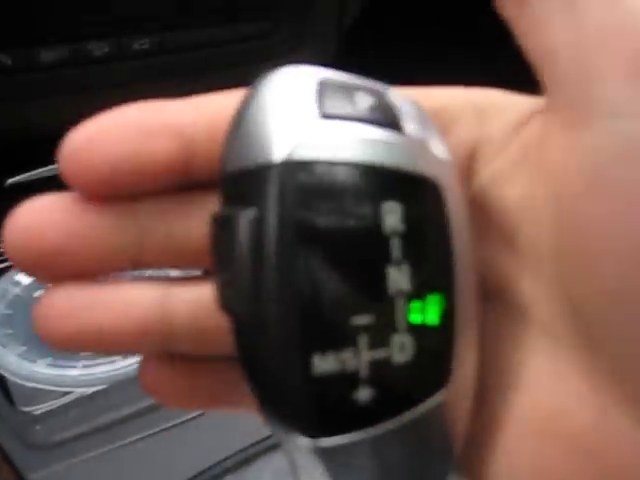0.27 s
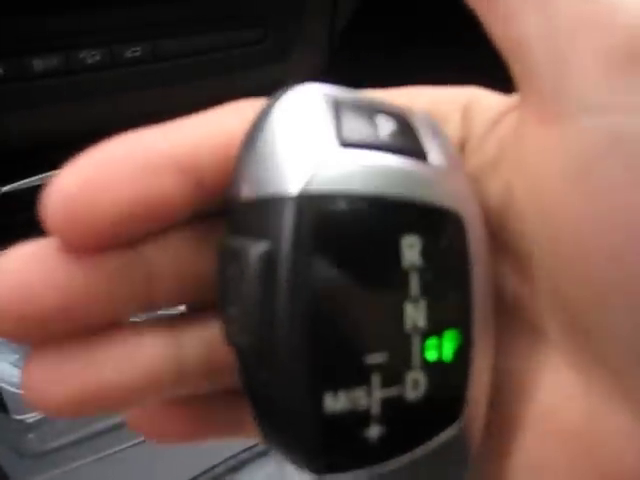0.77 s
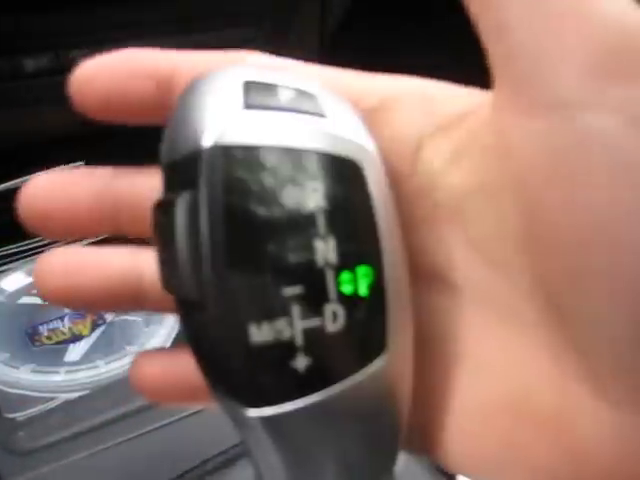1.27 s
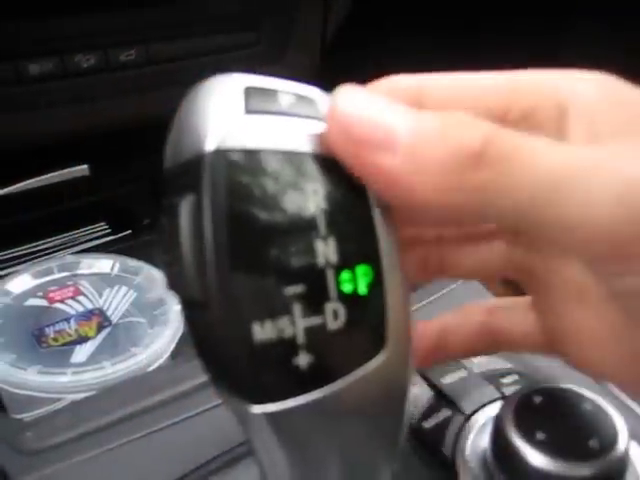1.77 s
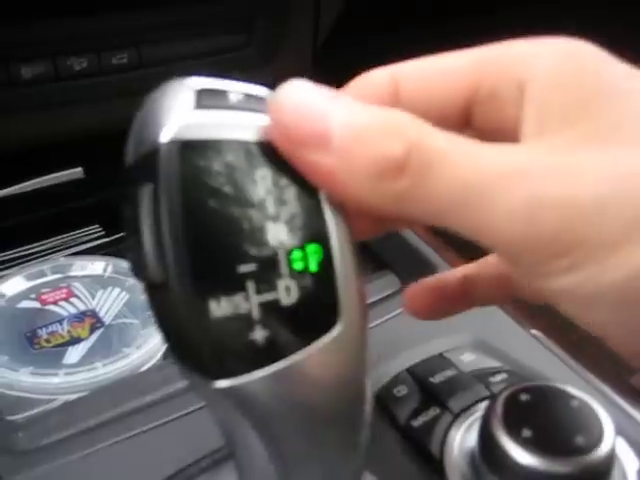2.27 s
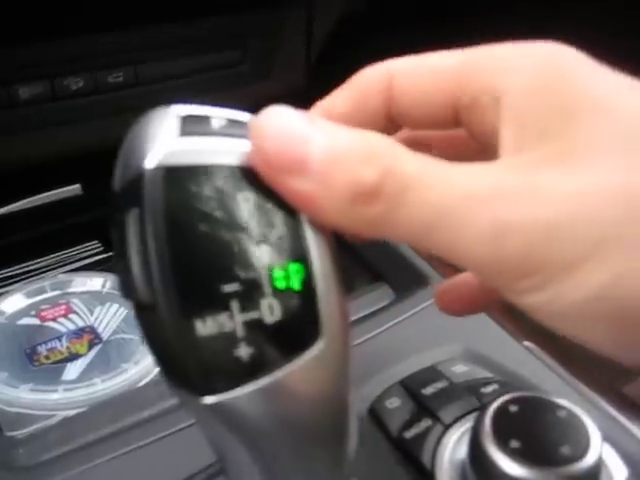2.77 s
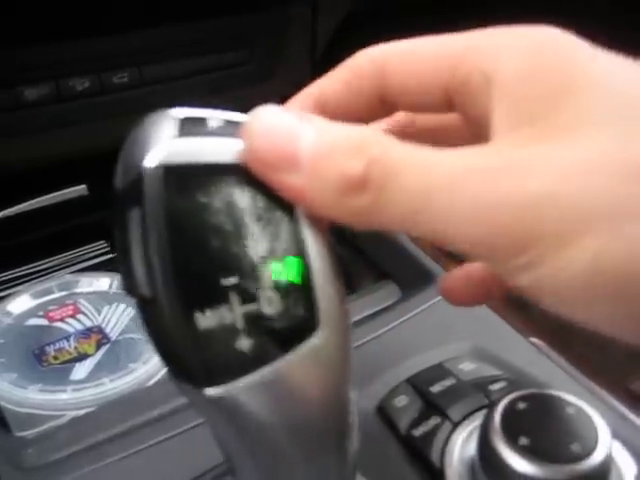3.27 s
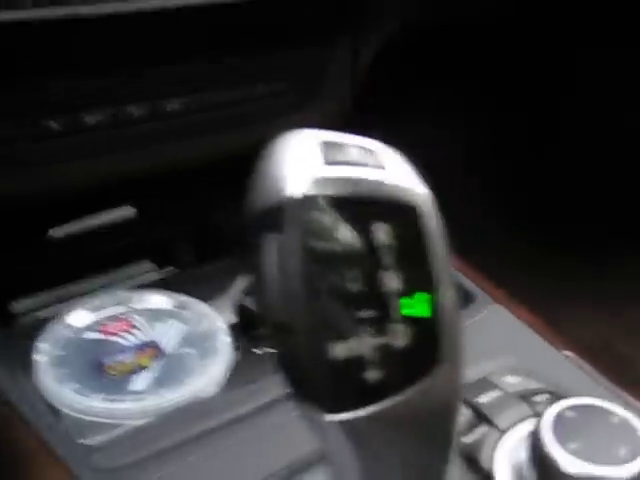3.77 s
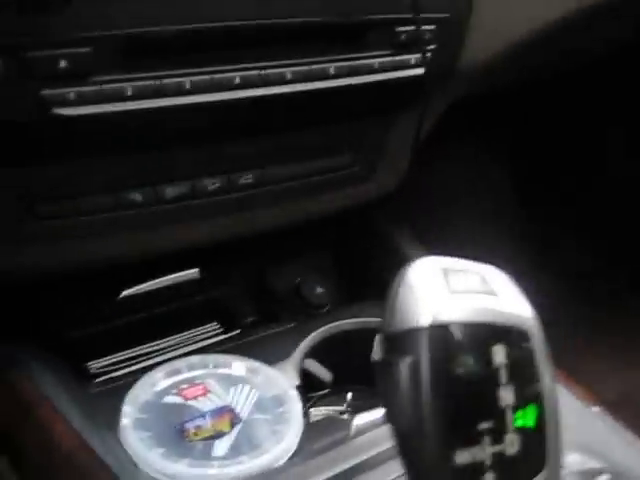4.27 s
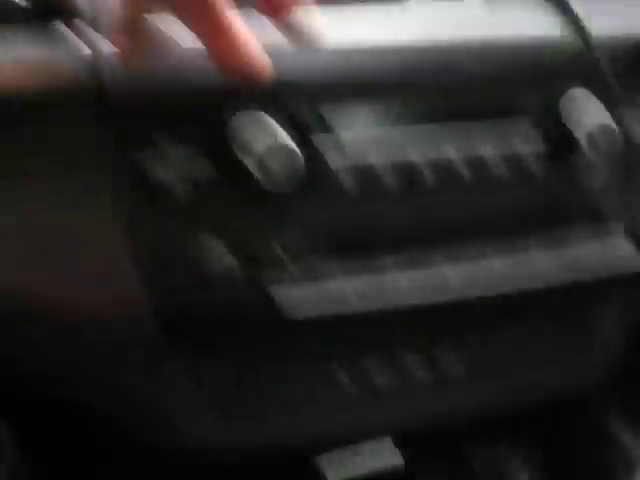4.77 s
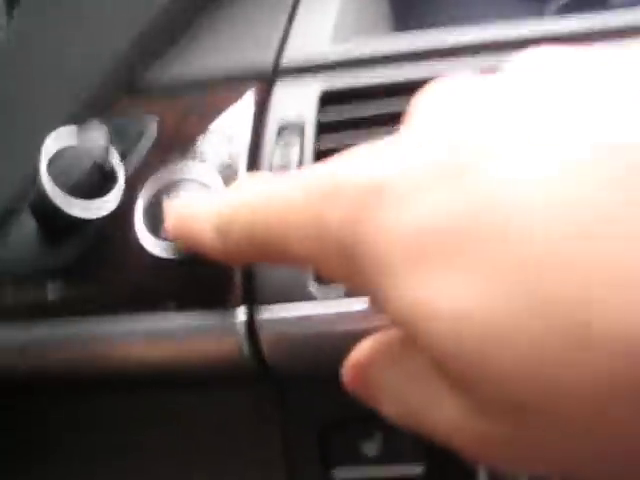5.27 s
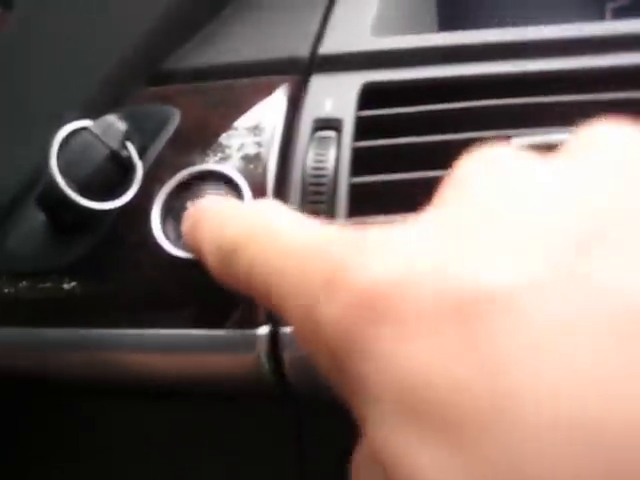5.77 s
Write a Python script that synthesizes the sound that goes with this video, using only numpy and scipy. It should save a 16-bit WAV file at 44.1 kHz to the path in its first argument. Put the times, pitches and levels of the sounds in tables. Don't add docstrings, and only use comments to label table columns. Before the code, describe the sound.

Close up in a car cabin, a gear selector snaps and knocks, a seat creaks, a button clunks, and muffled traffic roar swells.

```python
import sys
import numpy as np
from scipy import signal
from scipy.fft import rfft, irfft
from scipy.io import wavfile
from scipy.ndimage import uniform_filter1d

SR = 44100
rng = np.random.default_rng(int(sys.argv[2]) if len(sys.argv) > 2 else 0)


def voltage_ratio(decibels):
    exponent = np.asarray(decibels, float) / 20
    return 10 ** exponent


def int16_out(signal):
    q = np.round(np.clip(np.atleast_2d(signal).T, -1, 1) * 32767)
    wavfile.write(sys.argv[1], SR, q.astype(np.int16))


N = 265393


def set_rms(x, db):
    return x * voltage_ratio(db) / np.sqrt(np.mean(x ** 2))


def resonance(x, hz, width_hz):
    return signal.lfilter(*signal.iirpeak(min(hz, .45 * SR), hz / width_hz, fs=SR), x)


def double_resonance(x, hz, width_hz):
    return resonance(resonance(x, hz, width_hz), hz, width_hz)


def shaped_noise(spectrum):
    hz, db = np.transpose(spectrum)
    bins_hz = np.arange(1, N // 2 + 2) * SR / N
    gain = voltage_ratio(np.interp(np.log(bins_hz), np.log(hz), db))
    return set_rms(irfft(rfft(rng.standard_normal(N)) * gain, N), 0)


def wander(rate_hz):
    hold = int(SR / rate_hz)
    steps = np.repeat(rng.standard_normal(N // hold + 1), hold)
    return 0.54 * uniform_filter1d(steps, hold)[:N]


def mode(force, hz, t60):
    pole = np.exp(2j * np.pi * hz / SR - np.log(1000) / (max(t60, .002) * SR))
    return signal.lfilter([1], [1, -pole], force).imag


def place(out, x, s, peak_db):
    i = int(s * SR)
    out[i:i + len(x)] += (voltage_ratio(peak_db) * x / np.abs(x).max())[:N - i]


def slip_ticks(chance, rate_hz, scatter_db):
    happens = chance[0] < rate_hz / SR
    size = voltage_ratio(-scatter_db * np.log(chance[2] + 0.0033))
    return happens * np.sign(chance[1] - .5) * size


# (time [s], peak [dB], ring [Hz], ring t60 [s], crack re ring [dB])
LATCH_SNAPS = [(0.6316, -16.5, 2600, .012, -10), (0.6383, -31, 2580, 0.015, -14),
               (0.6404, -9, 2350, 0.013, -5), (0.6412, -17, 4500, .01, 3), (1.053, -34.5, 2400, 0.026, -9),
               (1.114, -21.5, 2030, 0.016, -19), (1.121, -21.5, 3060, 0.005, -3),
               (1.176, -18.5, 2850, .012, 2), (1.1775, -22.5, 5170, 0.013, -11),
               (1.187, -29.5, 1900, 0.017, -23.5), (1.266, -35, 2440, .029, -14),
               (2.2, -33, 1920, 0.044, -14), (2.8382, -20.5, 2720, 0.024, 3), (2.839, -24.5, 1490, 0.04, 3),
               (2.838, -24, 6000, 0.0093, -3), (3.396, -17, 1790, .011, -12),
               (3.406, -18, 2380, .0093, -19), (3.4145, -8.5, 1730, .0058, -9), (3.421, -34, 3080, .01, -4),
               (3.434, -22.5, 4070, 0.016, -3), (3.443, -31, 3130, .012, -12)]
# (time [s], peak [dB], ring [Hz], ring t60 [s], crack re ring [dB])
BUTTON_SNAPS = [(4.013, -31.5, 1370, 0.0089, -8), (4.362, -29, 1240, 0.033, 1),
                (5.158, -30, 1100, 0.0053, -6), (5.192, -24.5, 1680, 0.0043, -8),
                (5.388, -14, 2080, 0.012, 6.5), (5.777, -20, 3410, 0.034, 3), (5.9216, -10, 2910, .016, -1),
                (5.926, -15.5, 1046, .06, -3), (5.939, -6.5, 2470, 0.029, 0.5),
                (5.949, -20, 1900, 0.068, -8), (5.957, -20, 2440, 0.065, 0)]
# (time [s], peak [dB], ring [Hz], crack re ring [dB])
NAIL_TAPS = [(.064, -36, 3470, 0), (1.149, -37, 5000, -6), (4.061, -30.5, 3320, 5), (4.113, -30, 5160, 20),
             (5.148, -28, 3300, 7), (5.16, -28, 5200, 12), (5.165, -19.5, 4120, 2), (5.174, -23, 3800, -14),
             (5.183, -22, 2670, -11), (5.282, -24, 2480, 7), (5.343, -25, 6240, -15),
             (5.429, -23.5, 5940, -2), (5.7, -39, 3740, 2), (5.724, -34, 3500, -5), (5.904, -25, 3370, -11)]


def clicks():
    latch_contact_s, button_contact_s, tap_contact_s, tap_t60_s = .0006, 0.001293, 0.00061, 0.0077
    snaps = [(*row, latch_contact_s) for row in LATCH_SNAPS]
    snaps += [(*row, button_contact_s) for row in BUTTON_SNAPS]
    snaps += [(s, db, hz, tap_t60_s, crack_db, tap_contact_s) for s, db, hz, crack_db in NAIL_TAPS]
    out, t = np.zeros(N), np.arange(4096) / SR
    for s, db, hz, t60, crack_db, contact in snaps:
        noise = rng.standard_normal(4096)
        force = noise * t / contact * np.exp(1 - t / contact)
        force[int(contact * SR)] += 9.0
        body = 2.5 * mode(force, 1.05 * hz, .3 * t60)
        body += mode(force, hz, t60)
        body += .6 * mode(force, .74 * hz, 1.5 * t60)
        body -= .5 * mode(force, 1.32 * hz, .7 * t60)
        body += .45 * mode(force, 1.75 * hz, .5 * t60)
        body = resonance(body, hz, 1.6 * hz)
        crack = resonance(resonance(force, 5100, 7200), 6900, 7800)
        snap = body / np.abs(body).max() + voltage_ratio(crack_db) * crack / np.abs(crack).max()
        tail = signal.fftconvolve(snap[:40], noise[::-1] * np.exp(-t / .012))[:4096]
        place(out, snap + voltage_ratio(-25.0) * resonance(tail, 2400, 5200), s, db)
    return out


# (pitch ratio [1], level [dB], t60 ratio [1])
PANEL_MODES = [(.78, -19, 3.3), (1, 5.5, 2.03), (1.2, 2.5, 1.57), (1.6, -26, 0.55), (2.15, -4, 1.12),
               (2.37, -14, 2.3), (2.8, -2.5, 0.27), (3.4, -13, 1.34), (4.05, -10, 0.78), (4.5, -15, 1),
               (5.6, -12, 0.17), (7.1, -16, 1.05)]
# (time [s], peak [dB], main low panel [Hz], upper panels [dB], ring t60 [s])
CONSOLE_BLOWS = [(0.046, -38, 200, -14, 0.028), (.647, -28, 212, -4.5, 0.059),
                 (0.919, -46, 205, -21, 0.087), (1.116, -23.5, 227, 25, 0.0083),
                 (1.122, -17.5, 246.6, -9, 0.072), (1.183, -26, 235, -8, 0.065),
                 (1.682, -35, 248, -1, 0.065), (2.174, -33.5, 238, -9, 0.15),
                 (2.193, -24.5, 240, -12.5, 0.066), (2.843, -35.5, 253, -4.5, 0.073),
                 (3.334, -26, 228, -12, .06), (3.344, -25.5, 211, -2, 0.12), (3.399, -11, 245, 0.5, .065),
                 (3.408, -10.5, 246, 3, 0.053), (3.424, -15.5, 303, -1, 0.062),
                 (3.438, -17.5, 265, 4, 0.04), (3.458, -32.5, 242.5, 3.5, 0.16),
                 (3.735, -32.5, 239, -5, 0.057)]
# (time [s], peak [dB], main low panel [Hz], upper panels [dB], ring t60 [s])
DASH_BLOWS = [
    (4.36, -28, 267, 10, 0.16),
    (5.156, -22.5, 290, 5, 0.0079),
    (5.166, -14, 284, 8, 0.038),
    (5.169, -26, 191, -9, 0.029),
    (5.696, -29, 262.6, 19, .15),
    (5.781, -26.5, 199.4, 11, 0.095),
    (5.925, -20, 228.5, 25, 0.11),
    (5.928, -31, 129, -29, .1),
    (5.937, -33, 240, 16, 0.087),
]


def thumps():
    console_push_s, dash_push_s = 0.0086, 0.004
    console_hz = 246.8
    blows = [(*row, console_push_s, console_hz) for row in CONSOLE_BLOWS]
    blows += [(*row, dash_push_s, row[2]) for row in DASH_BLOWS]
    out, t = np.zeros(N), np.arange(12000) / SR
    for s, db, hz, upper_db, t60, push, upper_hz in blows:
        shove = np.sin(np.pi * np.clip((t - 0.24 * push) * 2 * hz, 0, 1))
        rough = rng.standard_normal(12000) * np.sin(np.pi * np.clip(t / push, 0, 1))
        rough *= voltage_ratio(upper_db + 9.0) * np.sqrt(np.sum(shove) ** 2 / np.sum(rough ** 2))
        thump = np.zeros(12000)
        for ratio, mode_db, t60_ratio in PANEL_MODES:
            force, base_hz = (rough, upper_hz) if ratio > 1.4 else (shove, hz)
            thump += voltage_ratio(mode_db) * mode(force, base_hz * ratio, t60 * t60_ratio)
        place(out, thump, s, db)
    return out


# (frequency [Hz], t60 [s], level [dB])
CABIN_AIR = (63.8, 0.43, -39.5)


def cabin_boom(blows):
    hz, t60, db = CABIN_AIR
    push = resonance(np.sqrt(np.abs(blows)), hz, 38)
    return voltage_ratio(db) * mode(push, hz, t60) / 100


# (time [s], length [s], level [dB], centre [Hz], width [Hz])
TRIM_RATTLES = [(1.115, .02, -45.5, 3800, 4500), (1.125, 0.076, -52, 2560, 2000),
                (1.168, .008, -48, 2550, 600), (3.331, 0.069, -47, 2380, 3040),
                (3.399, 0.031, -29.5, 2250, 2570), (3.433, 0.017, -48, 2600, 2800),
                (4.208, 0.13, -57.5, 776, 300), (4.297, 0.068, -53, 760, 302),
                (4.304, 0.083, -57, 4400, 800), (4.351, 0.033, -45.5, 2500, 4100),
                (5.168, 0.027, -38, 3700, 2500), (5.169, 0.042, -38, 7600, 3000),
                (5.375, 0.043, -37, 3940, 6100), (5.417, 0.016, -41.5, 7000, 7000),
                (5.887, 0.015, -40, 4940, 6040), (5.937, 0.0057, -24.5, 3520, 1990),
                (5.954, 0.025, -34.5, 3600, 4500), (5.998, 0.015, -45, 3470, 2500),
                (1.275, 0.15, -63.5, 2400, 400), (5.165, .04, -40, 1230, 1400),
                (1.175, 0.025, -46, 990, 900), (2.168, 0.096, -54, 970, 1600),
                (2.832, 0.059, -49.5, 900, 1300)]


def rattles():
    out, t = np.zeros(N), np.arange(4096) / SR
    for s, length, db, hz, width_hz in TRIM_RATTLES:
        decay = np.exp(-np.maximum(t - 0.48 * length, 0) / (0.31 * length))
        run = slip_ticks(rng.random((3, 4096)), 3100, 2.03) * decay
        place(out, double_resonance(run, hz, 1.18 * width_hz), s, db + 16)
    return out


# (fastest slide [s], rise [s], fall [s], peak [dB], treble re level [dB])
KNOB_RUBS = [(.04, 0.039, 0.055, -51.5, -6), (1.41, .04, .09, -52.5, 3), (1.515, 0.15, .13, -41.5, -14),
             (2.18, 0.022, 0.068, -52, -11), (3.52, 0.094, 0.42, -55.5, -6),
             (3.812, 0.027, .028, -39, -5.5), (4, 0.18, 0.25, -52.5, -7), (4.22, 0.071, 0.3, -52, -9),
             (5.2, 0.018, .05, -40.5, -8), (5.3, 0.078, 0.11, -38.5, -8), (5.73, 0.012, .03, -46, -9),
             (5.782, 0.032, 0.033, -39, -6), (5.815, .03, 0.07, -47, -4)]
# (fastest slide [s], rise [s], fall [s], peak [dB], treble re level [dB])
SLEEVE_DRAGS = [
    (5.28, 0.1, 0.065, -37.5, -22),
    (5.33, .06, 0.11, -36.5, -1.5),
    (5.395, 0.012, 0.034, -35.5, -10),
    (5.46, 0.043, 0.089, -45, -19),
]
# (centre [Hz], width [Hz])
KNOB_BANDS = [(3940, 4300), (6430, 9600), (2170, 2700)]
# (centre [Hz], width [Hz])
SLEEVE_BANDS = [(1950, 1640), (6900, 1700)]


def rubs():
    stroke_fade_db = 20.5
    t = np.arange(N) / SR
    grain = rng.standard_normal(N) * voltage_ratio(3.1 * wander(300) + 1.6 * wander(40))
    bands = [set_rms(double_resonance(grain, *row), 0) for row in KNOB_BANDS + SLEEVE_BANDS]
    mid, high, low, cloth, cuff = bands
    knob = mid + voltage_ratio(-9) * low
    out = np.zeros(N)
    for strokes, body, treble in [(KNOB_RUBS, knob, high), (SLEEVE_DRAGS, cloth, cuff)]:
        for s, rise, fall, db, treble_db in strokes:
            away = np.where(t < s, (s - t) / rise, (t - s) / fall)
            swell = voltage_ratio(db - stroke_fade_db * np.minimum(away, 9) ** 1.3)
            out += swell * (body + voltage_ratio(treble_db) * treble)
    return signal.sosfilt(signal.butter(4, 10300, fs=SR, output="sos"), out)


# (time [s], peak [dB])
LEATHER_SLIPS = [(4.312, -38), (4.396, -35), (4.434, -39), (4.472, -38), (4.523, -38), (4.579, -32),
                 (4.643, -32.5), (4.669, -33.5), (4.699, -34), (4.715, -29), (4.741, -31), (4.765, -26.5),
                 (4.794, -27), (4.816, -26), (4.849, -31), (4.88, -25), (4.914, -26.5), (4.949, -31),
                 (4.977, -23), (5.008, -26.5), (5.036, -25.5), (5.063, -33), (5.087, -25), (5.123, -30),
                 (5.216, -34), (5.238, -30)]
# (centre [Hz], width [Hz], level [dB])
LEATHER_BANDS = [(6230, 4500, 13), (8500, 1700, 6), (13500, 3300, -20)]


def creaks():
    slip_s = .015
    out, t = np.zeros(N), np.arange(2048) / SR
    for s, db in LEATHER_SLIPS:
        chance = rng.random((3, 2048))
        run = (slip_ticks(chance, 900, 2.4) + 1.4 * (t == 0)) * (t < slip_s)
        run = run + 0.2 * signal.lfilter([1], [1, -.985], np.abs(run)) * (chance[1] - .5)
        creak = np.zeros(2048)
        for hz, width_hz, band_db in LEATHER_BANDS:
            creak += voltage_ratio(band_db) * resonance(resonance(run, hz, 2 * width_hz), hz, width_hz)
        place(out, creak, s, db)
    return out


# (time [s], tyre roar [dB], engine drone re roar [dB])
PASSING_CAR = [
    (3.4, -56.5, -9),
    (4.24, -54.5, -4),
    (4.75, -55.5, -0.5),
    (5.22, -47, -4.5),
    (5.34, -43.5, -5),
    (5.69, -45.5, -3),
    (5.86, -42.5, -3.5),
    (6.02, -42, -9),
]
# (frequency [Hz], density [dB per Hz])
TYRE_SPECTRUM = [(59, -30), (100, -15), (193, -4), (695, -2.5), (1010, 3), (2500, -14), (2910, -10.5),
                 (6790, -15.5), (7740, -12.5), (9000, -21), (11700, -26), (19800, -120)]
# (centre [Hz], width [Hz], level [dB])
ENGINE_BANDS = [(67.5, 22, -8.5), (128.8, 8.1, -9.5), (200, 73, -14.5), (252, 4.3, -5.5)]


def street():
    t = np.arange(N) / SR
    s, roar_db, drone_db = np.transpose(PASSING_CAR)
    drone = np.zeros(N)
    for hz, width_hz, band_db in ENGINE_BANDS:
        drone += voltage_ratio(band_db) * set_rms(double_resonance(rng.standard_normal(N), hz, width_hz), 0)
    roar = shaped_noise(TYRE_SPECTRUM) * voltage_ratio(2.5 + 0.26 * wander(11.0))
    fade_in = np.clip((t - s[0]) / 0.33, 0, 1)
    car = roar + voltage_ratio(np.interp(t, s, drone_db)) * drone
    return fade_in * voltage_ratio(np.interp(t, s, roar_db)) * car


# (frequency [Hz], density [dB per Hz])
HISS_SPECTRUM = [(25, -3.5), (60, -1.5), (150, 1), (500, 1), (2000, -4.5), (4600, -8.5), (5100, -5),
                 (6500, -10), (7600, -8), (8800, -11.5), (9800, -4), (11000, -10.5), (12900, -16),
                 (14500, -11.5), (15200, -7.5), (16000, -29)]
# (frequency [Hz], rms [dB], octave rms [dB], frame rate [Hz], wobble [rad])
SENSOR_TONE = (7560, -57.5, -69, 30, .7)


def camera():
    t = np.arange(N) / SR
    hz, db, octave_db, frame_hz, wobble = SENSOR_TONE
    phase = 2 * np.pi * hz * t + wobble * np.sin(2 * np.pi * frame_hz * t) + 0.18 * wander(16)
    tone = voltage_ratio(db + .5 * wander(30)) * np.sin(phase)
    octave = voltage_ratio(octave_db) * np.sin(2 * phase)
    hiss = voltage_ratio(-50 + 0.83 * wander(2.4)) * shaped_noise(HISS_SPECTRUM)
    return hiss + np.sqrt(2) * (tone + octave)


def scene():
    blows = thumps()
    parts = signal.sosfilt(signal.butter(4, 140, "high", fs=SR, output="sos"), clicks() + blows)
    mix = parts + cabin_boom(blows) + rattles() + rubs() + creaks() + street() + camera()
    return mix[None]


def roll_off(x):
    return signal.sosfilt(signal.butter(12, 16510, fs=SR, output="sos"), x)


def record(dry):
    mix = signal.sosfilt(signal.ellip(8, .2, 60, 15850, fs=SR, output="sos"), dry)
    return roll_off(mix)


dry = scene()
out = record(dry)
int16_out(out)
```